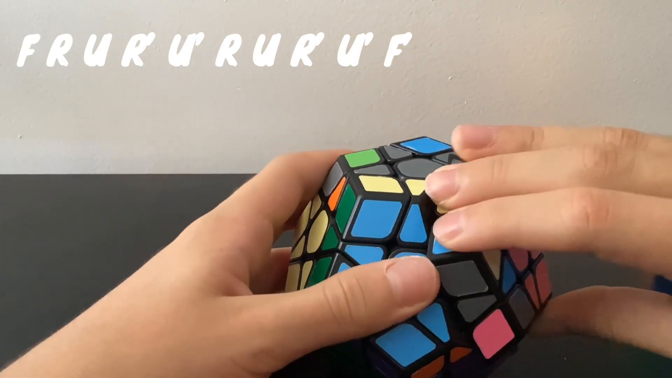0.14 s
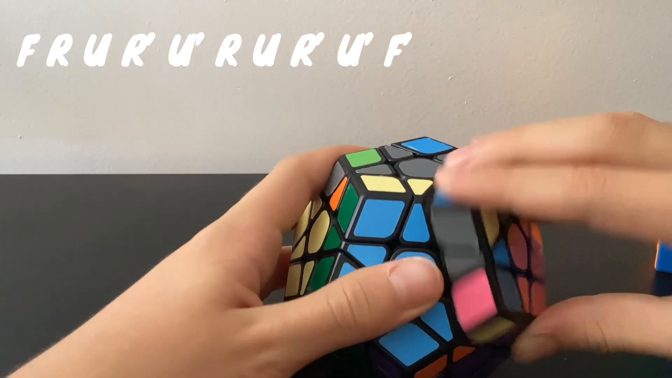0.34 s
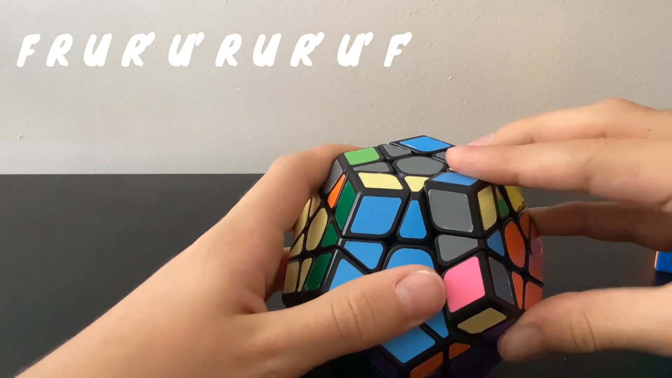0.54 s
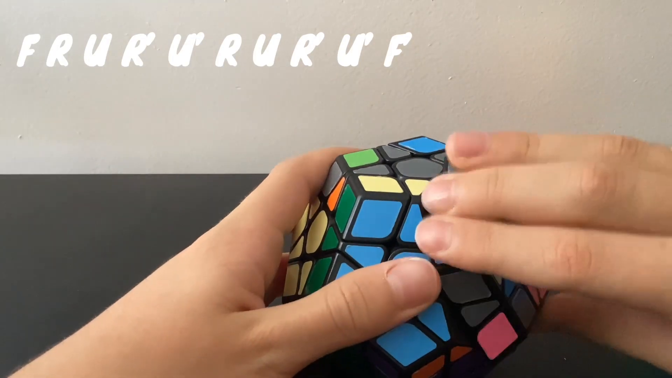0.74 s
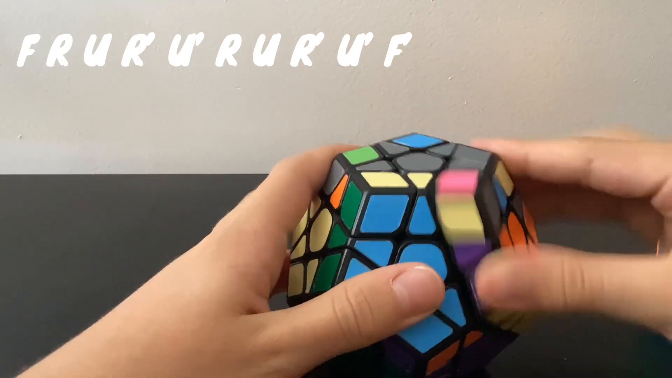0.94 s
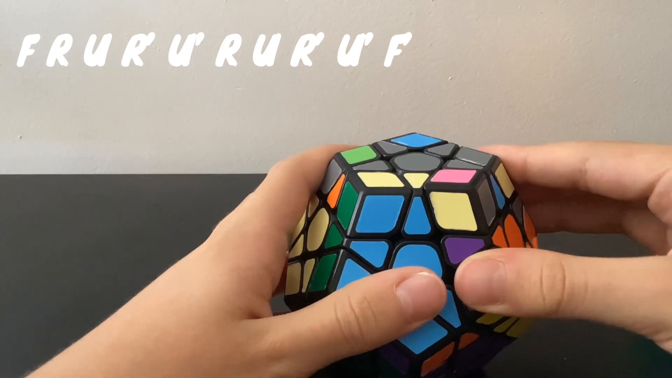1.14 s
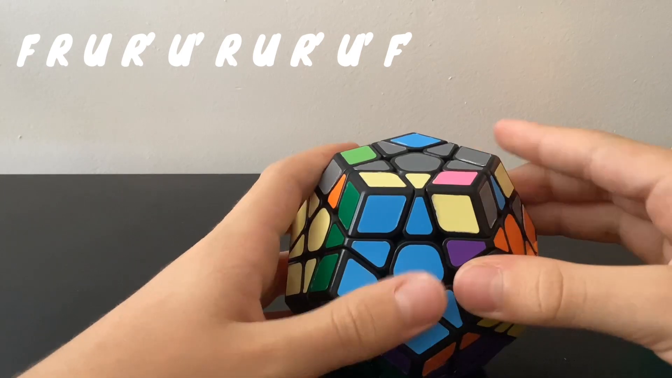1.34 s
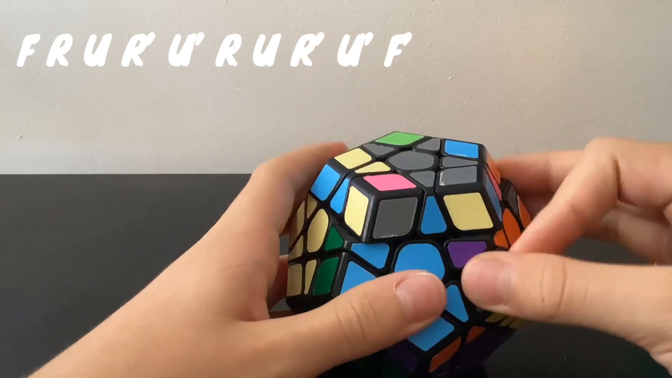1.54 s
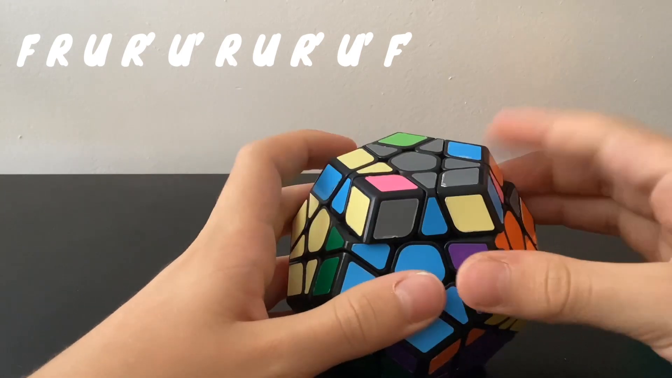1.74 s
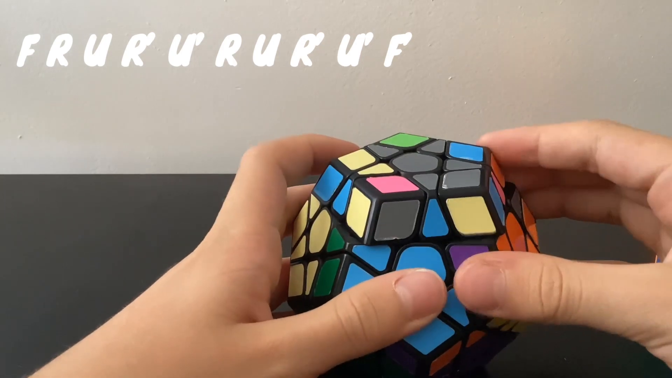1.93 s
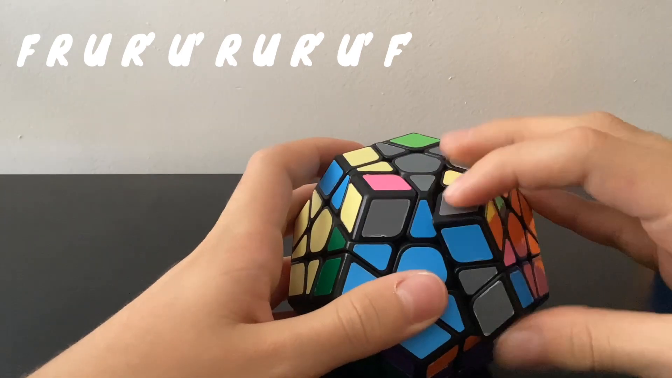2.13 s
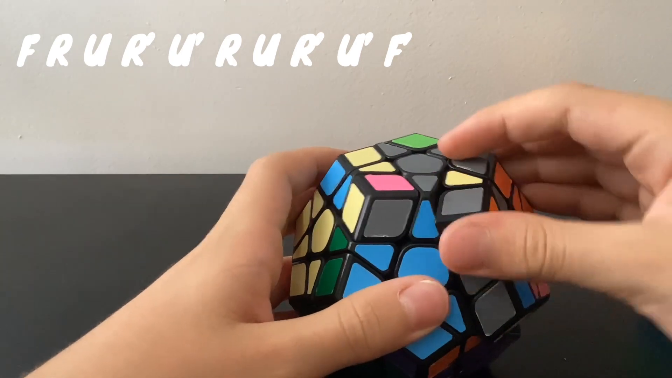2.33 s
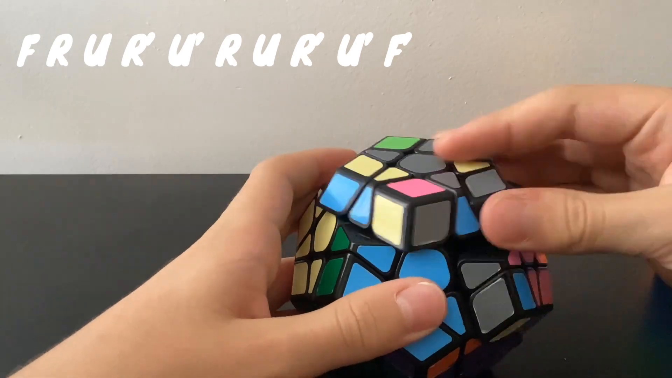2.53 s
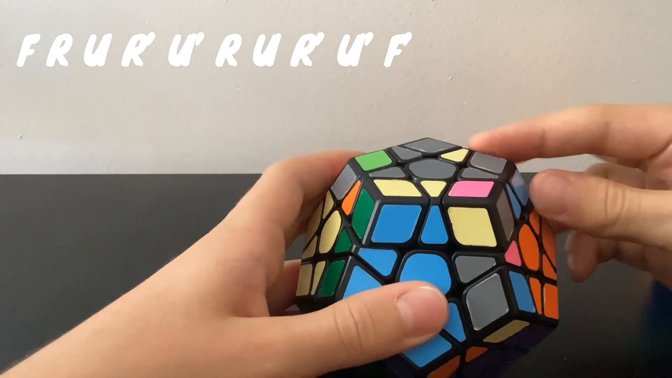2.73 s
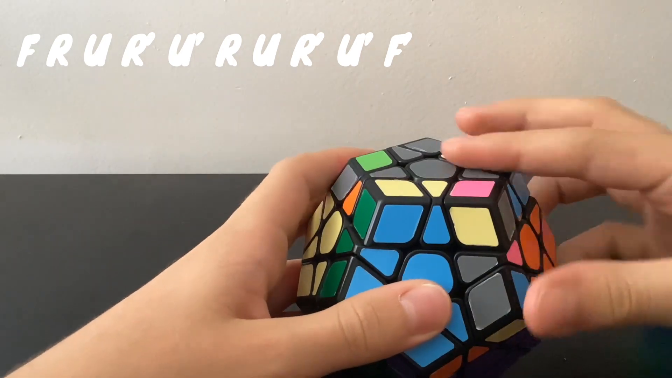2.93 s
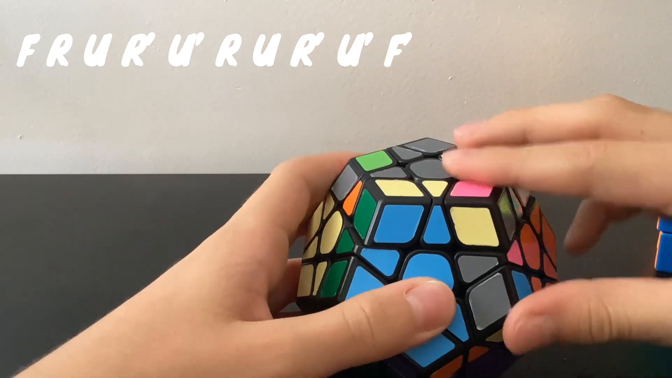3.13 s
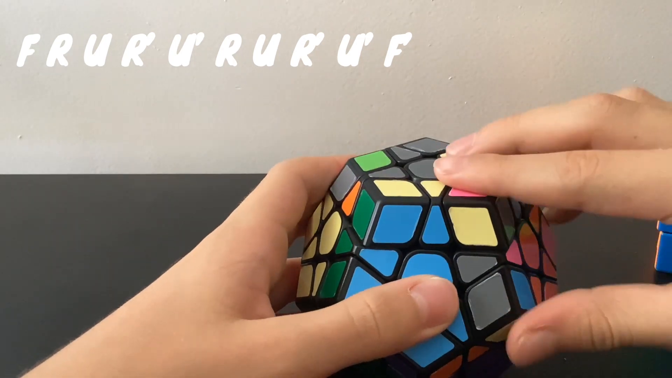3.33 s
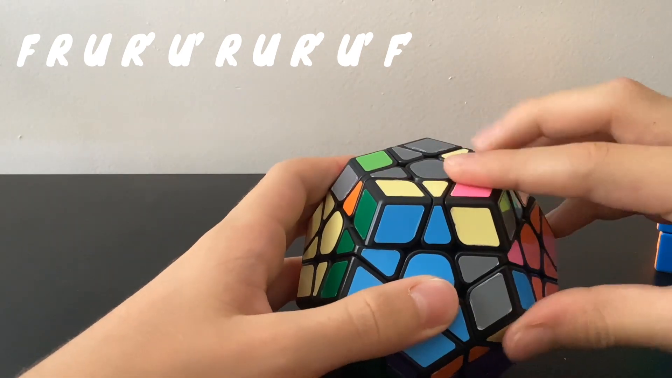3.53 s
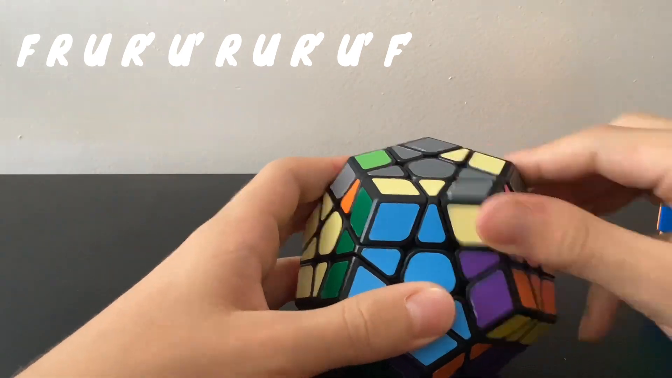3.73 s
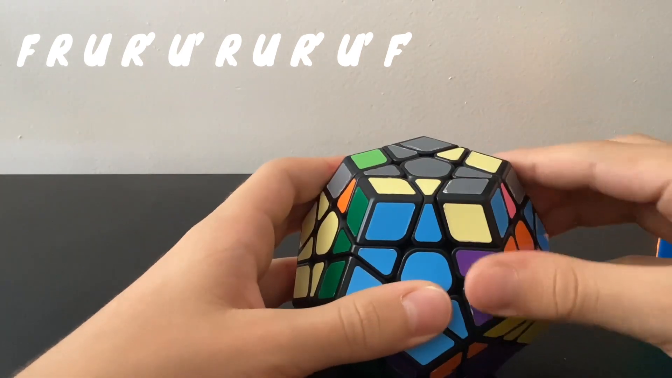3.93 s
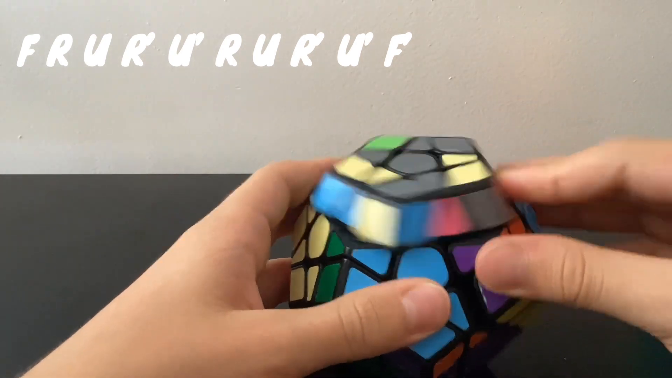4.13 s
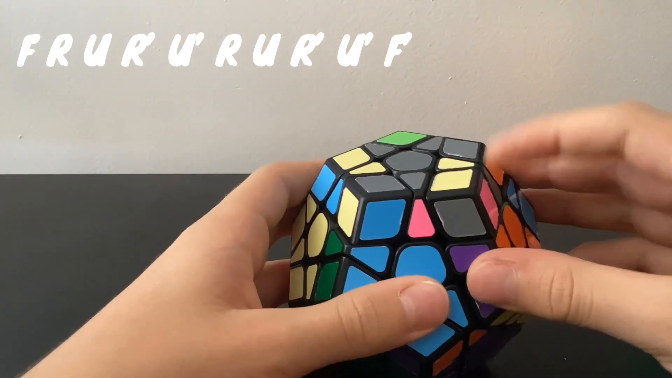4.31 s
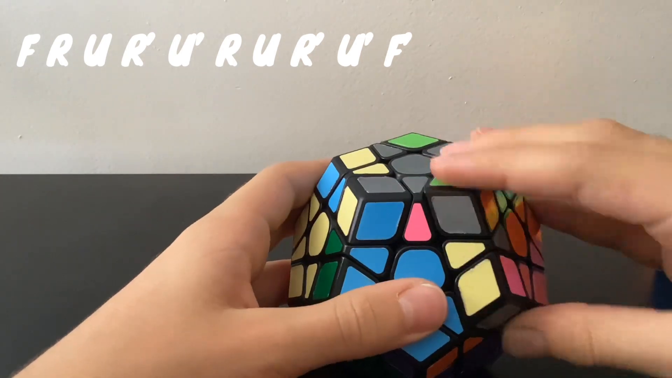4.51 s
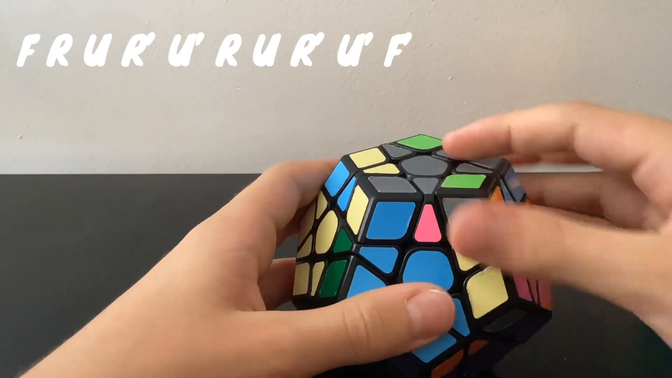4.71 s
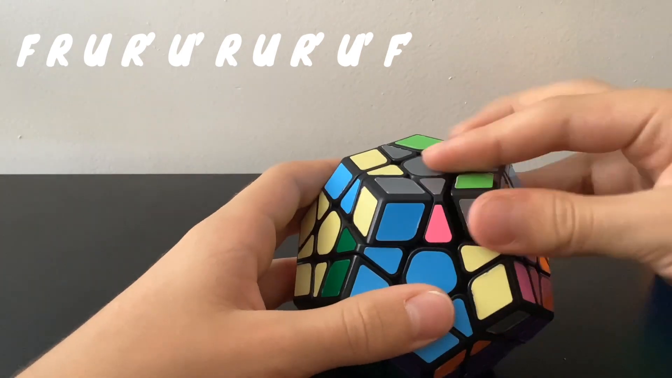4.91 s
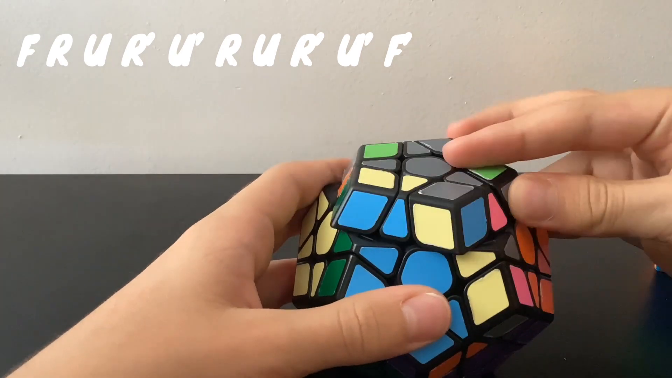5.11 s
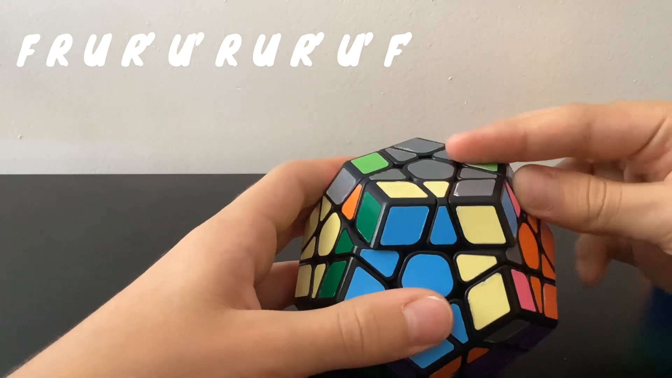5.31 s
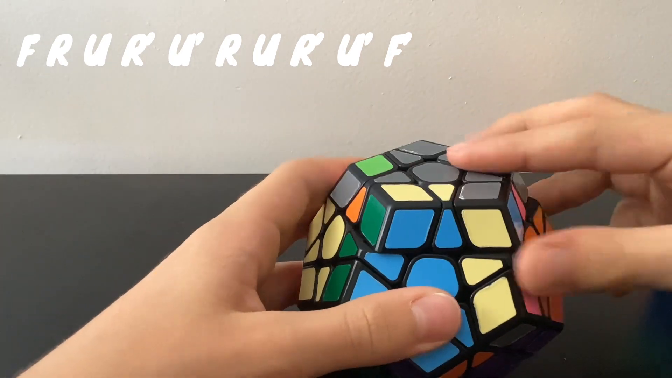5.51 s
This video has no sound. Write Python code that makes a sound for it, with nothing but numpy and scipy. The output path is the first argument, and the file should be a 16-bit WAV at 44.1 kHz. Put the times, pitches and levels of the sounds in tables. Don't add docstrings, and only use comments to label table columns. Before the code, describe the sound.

Close dry clatter of a hand-turned plastic puzzle: clustered snaps and ticks, faint creaky grinding, low table thuds, a quiet pause, then more turns.

```python
import sys
import numpy as np
from scipy import signal
from scipy.fft import rfft, irfft, next_fast_len
from scipy.io import wavfile
from scipy.ndimage import uniform_filter1d, map_coordinates

SR = 44100
rng = np.random.default_rng(int(sys.argv[2]) if len(sys.argv) > 2 else 0)


def log_audio(samples):
    frames = np.atleast_2d(samples).T
    limited = np.clip(frames, -1, 1)
    pcm = np.round(limited * 32767).astype(np.int16)
    wavfile.write(sys.argv[1], SR, pcm)


def voltage_ratio(level):
    return 10 ** (np.asarray(level, float) / 20)


N = 245178

# f/Hz, density level/dB
HUSH_SPECTRUM = [(88, -28), (150, 2), (334, -11), (475, -12), (612, -24), (1420, -24), (2810, -35.5),
                 (9630, -38), (13700, -42.5), (16000, -56)]
# f/Hz, time to fall 60 dB/s
ROOM_DECAY = [(100, 0.73), (300, 0.2), (1000, 0.24), (4000, 0.28), (12000, 0.18)]
# f/Hz, width/Hz, level/dB
TABLE_MODES = [(88.7, 11.5, -1), (148.4, 12.3, -5.5)]
# f/Hz, width/Hz, level/dB
BALL_MODES = [(171.5, 60, -7), (274.3, 69, -1), (347.6, 111.3, 0.5), (399.1, 70.7, 1), (475, 116, -11),
              (578, 70, -9.5), (665.2, 72, -7)]
# f/Hz, width/Hz, level/dB
HOLLOW_MODES = [(875, 162, 3.5), (1224, 260, 1.5), (1571, 440, 1.5), (1942, 504, -4)]
# f/Hz, width/Hz, level/dB
WALL_MODES = [(2775, 634, 1.5), (3567, 318, 3.5), (5656, 960, -2.5), (7400, 520, -7.5), (8860, 930, -3.5),
              (13000, 1100, -19), (13700, 880, -9.5)]
# t/s, hold/s, top level/dB, frame level/dB
ARM_SHOVES = [(.05, .06, -51, -59), (0.35, 0.02, -47.5, -67), (0.613, 0.015, -45, -54),
              (0.718, .02, -48, -64), (0.904, 0.087, -38.5, -48), (1.288, 0.056, -48.5, -65),
              (1.517, 0.02, -32, -48), (1.667, 0.12, -53, -66), (2.002, 0.026, -42, -48),
              (2.42, 0.085, -50.5, -59), (2.64, 0.034, -48, -62), (2.983, 0.21, -59.5, -55),
              (3.68, 0.019, -52, -64), (4.072, 0.13, -43, -53), (4.4, 0.017, -40.5, -55),
              (4.86, 0.016, -50, -66), (5.0, 0.015, -41.5, -55), (5.255, 0.025, -53, -77)]
# t of full pressure/s, hold/s, creak level/dB, grind level/dB
LAYER_PUSHES = [(.0, 0.088, -44, -63.5), (.27, .03, -46.5, -62), (0.3, 0.087, -40, -82),
                (0.598, 0.043, -36.5, -67), (.72, 0.044, -52.5, -92), (0.847, 0.045, -40, -62),
                (0.899, 0.022, -31, -51.5), (1.0, 0.03, -42, -70), (1.275, .02, -49, -70),
                (1.449, 0.11, -44, -58.5), (1.605, 0.2, -50, -84), (1.965, 0.1, -39.5, -59.5),
                (2.35, 0.08, -54, -69), (2.417, 0.063, -45.5, -67), (2.581, 0.047, -42.5, -60),
                (2.665, 0.088, -48.5, -83), (3.259, 0.012, -48.5, -73.5), (3.649, 0.012, -33, -64),
                (3.686, 0.04, -57, -61), (3.922, .04, -57, -69.5), (3.969, 0.088, -49, -73),
                (4.083, .12, -39.5, -68), (4.375, 0.024, -36.5, -61), (4.434, 0.045, -40, -66),
                (4.63, 0.062, -52, -71), (4.823, 0.044, -43, -70), (4.973, 0.0067, -31, -49),
                (5.228, 0.04, -44, -65.5), (5.364, 0.022, -52, -77), (5.547, 0.017, -57, -80)]
# t of peak/s, tick level/dB, knock over tick/dB
GRAZES = [(.0575, -50, 19.5), (.076, -53, 20), (.2949, -51.5, 13), (.327, -53, 22.5), (.455, -57, 19.5),
          (.589, -65, 18), (.535, -68, 2), (.7191, -64.5, 27.5), (.831, -52.5, -4), (1.4342, -61.5, 14),
          (1.602, -52, -11), (2.3709, -53.5, 10), (2.5303, -58, 21.5), (2.719, -66, 6), (3.5869, -69, 20),
          (3.7399, -50.5, 18), (3.95, -66, -1), (4.0249, -55.5, 16.5), (4.0484, -49, 13.5),
          (4.3074, -57, 18), (4.4773, -51, 16), (4.6538, -61, 26), (4.7841, -55, 3), (4.8134, -58, 10),
          (4.8275, -55, -3), (4.9082, -60.5, 23), (5.2369, -54, 23.5), (5.2636, -55, 24.5),
          (5.2814, -51.5, 16.5), (5.545, -63, 14)]
# t of peak/s, tick level/dB, knock over tick/dB
BUMPS = [(.0075, -52.5, 20.5), (.0422, -33.5, 3.5), (.0994, -59, 7), (.4838, -56, -2), (.6537, -47, 17.5),
         (.6848, -61, 22), (.8583, -50.5, 18), (.951, -50, -1), (1.022, -50, 19.5), (1.0506, -47, 15.5),
         (1.2002, -55, 12), (1.4677, -51, -14), (1.6842, -46, 4), (1.9414, -57.5, 15), (2.0114, -40, -27),
         (2.3921, -51, 13), (2.4667, -54, 5), (2.5617, -57, 17), (2.5866, -43, 13), (2.6742, -53.5, 18.5),
         (3.2624, -56, 12), (3.651, -39, 10.5), (4.0165, -53.5, 14), (4.0884, -42.5, 10), (4.1043, -54, 22),
         (4.8406, -45.5, 6), (4.8656, -43.5, 14), (4.882, -44, 7), (5.358, -46, 6), (5.5508, -51, 14.5)]
# t of peak/s, tick level/dB, clack over tick/dB, knock over tick/dB
TICKS = [(0.2653, -48.5, 2, 11.5), (.311, -49.5, 7, 20), (.392, -46.5, 5, -1), (.6046, -43.5, 10.5, 16.5),
         (.6263, -62, 5, 13), (.849, -45.5, 5.5, 13.5), (0.8734, -49.5, 14.5, 17), (.945, -48, -9, 1),
         (1.017, -43.5, -2, 2), (1.4456, -44.5, 3.5, 10.5), (1.641, -49.5, 6, 21.5),
         (1.9655, -44.5, -1, 16.5), (1.9797, -45.5, 10.5, 13.5), (2.0049, -44, 7, 11.5),
         (2.3385, -45.5, 5.5, 10), (2.4432, -49.5, 8, 10), (2.4509, -49, 4, 11), (2.488, -48, -1, 18),
         (2.6029, -44.5, 7.5, 14.5), (2.767, -48, 7.5, 7.5), (3.641, -47, 3, 0), (3.6593, -54, 6, 11),
         (3.715, -59, 9, 10), (3.972, -50, 15, 14), (4.16, -44, 5, 16.5), (4.1845, -44, 6, -16),
         (4.2624, -49.5, 11, 2), (4.3958, -40, 1, 10), (4.458, -43.5, -5, 16), (5.225, -47, 8.5, 12.5)]
# t of peak/s, tick level/dB, brightness/dB, clack over tick/dB,
# knock over tick/dB
SNAPS = [(0.0481, -36, 11, -11, 5.5), (0.3699, -41, 1.5, 6.5, 23.5), (.896, -29, -3.5, -5, 13),
         (0.9068, -37, -8, 8.5, 7), (.92, -36, 9, 3, 4), (0.9609, -37.5, 1, 0, 5), (.98, -41, 0, 4, 11),
         (1.2708, -41.5, 0.5, 1.5, 10.5), (1.483, -33, -0.5, 5.5, 7), (1.4917, -33, 10, -3, 6.5),
         (1.5053, -24.5, -7, -17, -5.5), (1.517, -29, -1.5, 3.5, 7), (1.5311, -32, 17, -21, 5.5),
         (1.9965, -36, 6, -1, -15), (2.0309, -36, -4, -9, 5.5), (2.0515, -35.5, 1, 6.5, 10.5),
         (2.421, -42.5, 3, 1, 8.5), (2.6286, -31, 3.5, -4.3, 8.5),
         (3.666, -39.5, 9, 2.5, -7), (3.6949, -34.5, -19, 3, 11.5), (4.0975, -36, 6, 5, 14),
               (4.1342, -37.5, -7, 3.5, 7), (4.1692, -38, -1, 8.5, .6), (4.178, -36.5, 9, -15, 9),
               (4.3763, -35.5, 5.5, 0, -7), (4.387, -41, 9, 7.5, 12.5), (4.4528, -30, 6, -5, 0),
               (4.9616, -41, -5, 7, 0), (4.973, -29, 6.5, 3, 1.5), (4.9992, -41, -10, -8, 10.5)]

SPAN, LEAD = 4096, 640
TICK_BRIGHT_DB, BUMP_BRIGHT_DB, GRAZE_BRIGHT_DB, BRIGHT_SCATTER_DB = -1.5, -15, -0.5, 2
BUMP_CLACK_DB, GRAZE_CLACK_DB, CLACK_PER_DB = 7.5, 5.5, 0.5044
PUSH_RISE_DB_S, CREAK_FALL_DB_S, GRIND_FALL_DB_S = 1500, 157, 301
SHOVE_RISE_DB_S, SHOVE_FALL_DB_S, REST_TOP_DB, REST_FRAME_DB = 344.5, 174, -70, -68.5


def unit(x):
    return x / np.sqrt(np.mean(x ** 2) + 1e-20)


def along(points, hz):
    f, value = np.transpose(points)
    return np.interp(np.log(hz + 1), np.log(f + 1), value)


def wobble(rate):
    knots = rng.standard_normal(int(N * rate / SR) + 4)
    return map_coordinates(knots, [np.arange(N) * rate / SR])


def resonance(f, hz, width):
    damping = 1j * f * width
    return damping / (hz * hz - f * f + damping + 1e-9)


def modes(f, table, scatter_db=0):
    scatter_db = np.atleast_2d(scatter_db) + np.zeros(len(table))
    total = 0
    for k, (hz, width, db) in enumerate(table):
        total = total + (-1) ** k * voltage_ratio(db + scatter_db[:, [k]]) * resonance(f, hz, width)
    return total


def filtered(x, response):
    m = next_fast_len(N + SR // 2)
    return irfft(rfft(x, m) * response(np.fft.rfftfreq(m, 1 / SR)), m)[..., :N]


def steady(x, seconds):
    power = np.abs(uniform_filter1d(unit(x) ** 2, int(seconds * SR)))
    return x / np.sqrt(power + 0.0944) / np.std(x)


def swells(s, hold, db, rise_db, fall_db):
    coarse = np.arange(0, N, 64)
    t = coarse / SR - s[:, None]
    lost_db = rise_db * np.maximum(-t, 0) + fall_db * np.maximum(t - hold[:, None], 0)
    power = np.sum(voltage_ratio(db[:, None] - lost_db) ** 2, axis=0)
    return np.interp(np.arange(N), coarse, np.sqrt(power))


def hush():
    return unit(filtered(rng.standard_normal(N), lambda f: voltage_ratio(along(HUSH_SPECTRUM, f))))


def room_echo(x):
    out, step, delay = np.zeros(N + SR), SR // 3, 180
    for start in range(0, N, step):
        hz, t, z = signal.stft(rng.standard_normal(SR // 2), SR, nperseg=256)
        decay = voltage_ratio(-60 * t / along(ROOM_DECAY, hz)[:, None])
        tail = signal.istft(z * decay, SR, nperseg=256)[1]
        wet = signal.fftconvolve(x[start:start + step], tail / np.linalg.norm(tail))
        first = start + delay
        out[first:][:len(wet)] += wet[:len(out) - first]
    return out[:N]


def table_rumble():
    s, hold, top_db, frame_db = np.transpose(ARM_SHOVES)

    def weight(db, rest_db):
        return swells(s, hold, db, SHOVE_RISE_DB_S, SHOVE_FALL_DB_S) + voltage_ratio(rest_db)

    shove = rng.standard_normal((2, N))
    top = filtered(shove[0], lambda f: modes(f, TABLE_MODES)[0] * resonance(f, 103.0, 97))
    frame = filtered(shove[1], lambda f: resonance(f, 64, 25) * resonance(f, 45.7, 33.4))
    top, frame = steady(top, seconds=0.12), steady(frame, seconds=0.15)
    return weight(top_db, REST_TOP_DB) * top + weight(frame_db, REST_FRAME_DB) * frame


def grit(rate, spread_db):
    draw = rng.random((3, N))
    size = voltage_ratio(-spread_db * np.log(draw[1] + 0.042))
    jolts = (draw[0] < rate / SR) * size * np.sign(draw[2] - 0.5)
    return unit(jolts) + 0.43 * rng.standard_normal(N)


def turning():
    s, hold, creak_db, grind_db = np.transpose(LAYER_PUSHES)
    creak_db = 20 * np.log10(swells(s, hold, creak_db, PUSH_RISE_DB_S, CREAK_FALL_DB_S))
    grind_db = 20 * np.log10(swells(s, hold, grind_db, PUSH_RISE_DB_S, GRIND_FALL_DB_S))
    lumps = wobble(35)
    jolts = grit(450, spread_db=5)
    low = unit(filtered(jolts, lambda f: modes(f, BALL_MODES)[0] * resonance(f, 401, 1300)))
    mid = unit(filtered(jolts, lambda f: modes(f, HOLLOW_MODES)[0]))
    wake_db = np.clip(0.6 * (creak_db + 48), -20, 0)
    creak = voltage_ratio(1.68 * lumps) * (low + voltage_ratio(wake_db - 6.5) * mid)
    high = filtered(grit(1900, spread_db=3), lambda f: modes(f, WALL_MODES)[0] * resonance(f, 6000, 10000))
    grind = unit(voltage_ratio(3.6 * lumps) * high)
    return voltage_ratio(creak_db - 7) * creak + voltage_ratio(grind_db - 1.0) * grind


def contacts():
    rows = SNAPS
    rows += [(s, db, TICK_BRIGHT_DB, clack_db, knock_db) for s, db, clack_db, knock_db in TICKS]
    for kind, bright_db, clack_db in [(BUMPS, BUMP_BRIGHT_DB, BUMP_CLACK_DB),
                                      (GRAZES, GRAZE_BRIGHT_DB, GRAZE_CLACK_DB)]:
        for s, db, knock_db in kind:
            rows.append((s, db, bright_db, clack_db - CLACK_PER_DB * (db + 47), knock_db))
    return np.transpose(rows)[..., None]


def struck(rows, response, rise, fall, early=0, scrape_db=-60):
    t = (np.arange(SPAN) - LEAD) / SR + early
    blow = np.exp(np.minimum(t / rise, -t / fall))
    scrape = np.exp(np.minimum(t / 0.0027, -t / 0.0052))
    ring = irfft(rfft(rows * (blow + voltage_ratio(scrape_db) * scrape)) * response, SPAN)
    power = uniform_filter1d(ring ** 2, size=80, axis=1)
    return ring / np.sqrt(power.max(axis=1, keepdims=True) * 2)


def placed(rows, s):
    at = np.round(s * SR).astype(int) - LEAD + np.arange(SPAN)
    return np.bincount(np.clip(at, 0, None).ravel(), rows.ravel(), N + SPAN)[:N]


def snaps():
    s, db, bright_db, clack_db, knock_db = contacts()
    f = np.fft.rfftfreq(SPAN, 1 / SR)
    noise = rng.standard_normal((len(s), 3, SPAN))
    chance = noise[:, :, -8:]
    bright_db = bright_db + BRIGHT_SCATTER_DB * chance[:, 2, -1:]
    slope = np.tanh(np.log([hz / 6800 for hz, _, _ in WALL_MODES]) * 3) / 2
    tilt_db = 1.26 * (bright_db - 2.5) * slope

    def soft(hz):
        return 1 / (1 + 1.4j * f / hz - (f / hz) ** 2)

    def wall(scatter_db):
        return modes(f, WALL_MODES, scatter_db) * resonance(f, 8270, 14900)

    def hollow(scatter_db):
        return modes(f, HOLLOW_MODES, scatter_db) * resonance(f, 1100, 2030) * soft(2600)

    def ball(scatter_db):
        return modes(f, BALL_MODES, scatter_db) * resonance(f, 230, 891) * soft(980)

    wall_hit = wall(tilt_db + 3 * chance[:, 0, :len(WALL_MODES)])
    hollow_hit = hollow(3 * chance[:, 1, :len(HOLLOW_MODES)])
    ball_hit = ball(3 * chance[:, 2, :len(BALL_MODES)])
    tick = struck(noise[:, 0], wall_hit, rise=0.0012, fall=0.00094, scrape_db=-9)
    clack = struck(noise[:, 1], hollow_hit, rise=0.00019, fall=0.0015, early=0.00094, scrape_db=-9)
    knock = struck(noise[:, 2], ball_hit, rise=0.0013, fall=0.0021, early=0.0006)
    plain_tick, plain_clack, plain_knock = [struck(np.ones(1), response, rise=1 / SR, fall=1 / SR)
                                            for response in (wall(0.6 * tilt_db), hollow(0), ball(0))]
    tick_gain = voltage_ratio(db - 0.4)
    clack_gain = voltage_ratio(db + clack_db + 0.57)
    knock_gain = voltage_ratio(db + knock_db - 2.5)
    near = tick_gain * tick + clack_gain * clack + knock_gain * knock
    far = voltage_ratio(-1) * tick_gain * plain_tick
    far = far + voltage_ratio(-1.5) * clack_gain * plain_clack + voltage_ratio(2.1) * knock_gain * plain_knock
    return placed(near, s), placed(far, s)


def scene():
    near, far = snaps()
    slide = turning()
    background = voltage_ratio(-65) * hush() + table_rumble()
    return (background + voltage_ratio(-5.5) * room_echo(far + slide) + slide + near)[None]


def low_pass(x):
    return signal.sosfilt(signal.butter(12, 16470, fs=SR, output="sos"), x)


def record(dry):
    def band(f):
        bass_cut = (1j * f / (48 + 1j * f)) ** 3
        return bass_cut / (1 + (f / 15300) ** 16) * (f < 16150)

    return low_pass(filtered(dry, band))


dry = scene()
out = record(dry)
log_audio(out)
```